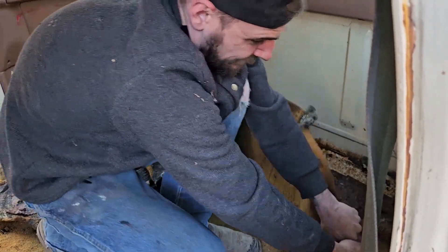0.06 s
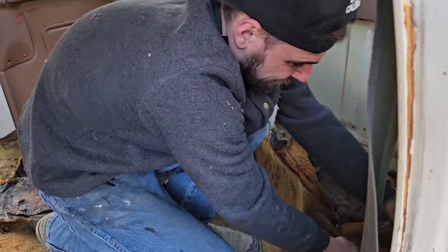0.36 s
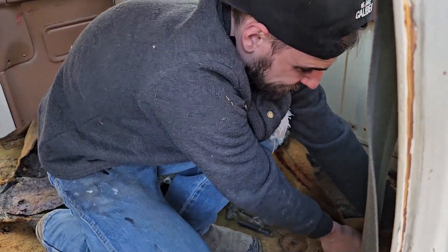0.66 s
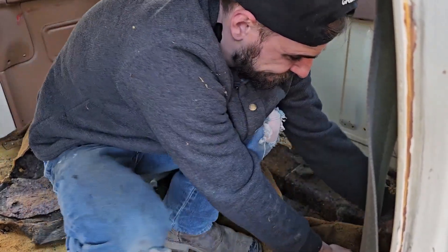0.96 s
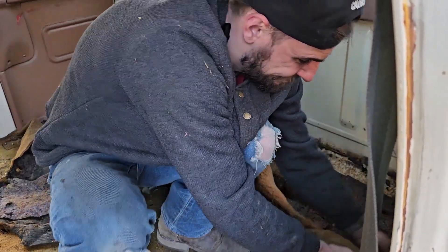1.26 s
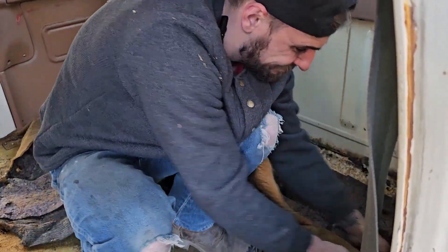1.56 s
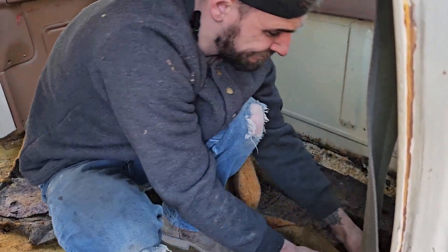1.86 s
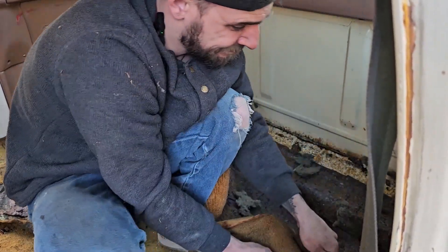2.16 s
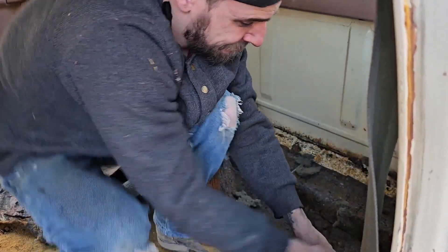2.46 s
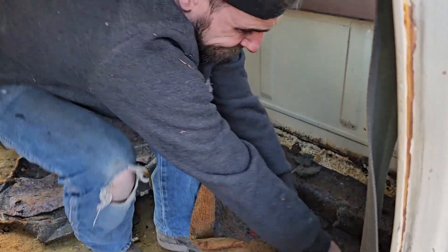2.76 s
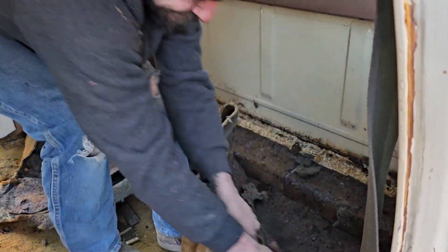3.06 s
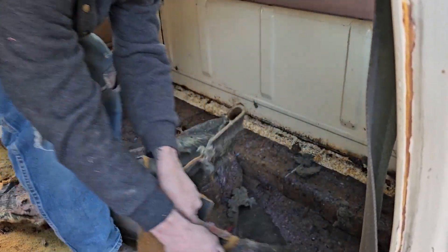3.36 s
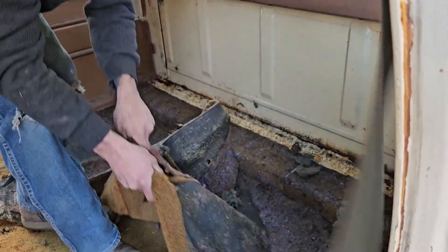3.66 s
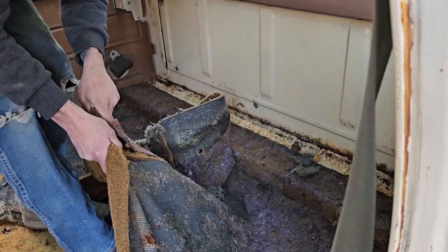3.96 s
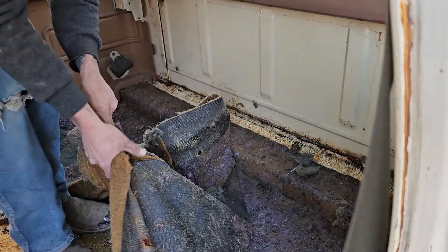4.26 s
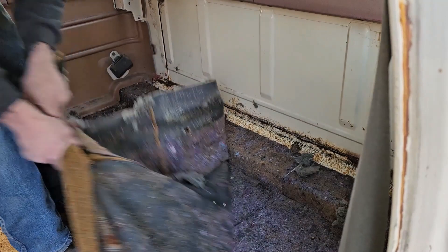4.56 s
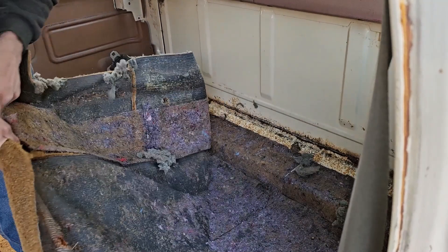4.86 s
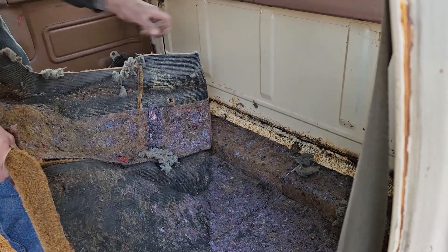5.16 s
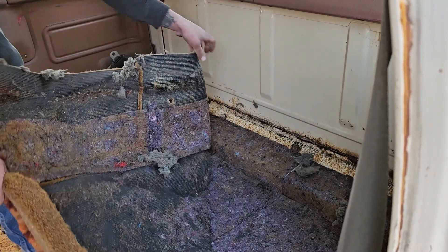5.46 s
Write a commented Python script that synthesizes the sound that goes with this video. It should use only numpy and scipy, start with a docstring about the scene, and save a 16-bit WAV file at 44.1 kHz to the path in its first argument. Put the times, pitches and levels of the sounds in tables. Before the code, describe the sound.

Old carpet is ripped off a steel truck floor in short tugs and one long haul, scraping and crackling, with snaps and boot thuds.

```python
"""Old carpet and its padding are ripped off the steel floor of a truck cab: short tugs, a long haul,
two more pulls and a last tug. Glue and fibres fracture in a dense crackle, stick-slip friction makes
the stiff backing scrape, and both are heard over the drumming of the floor pan. Stuck patches snap
free, boots thud on the pan, grit ticks and a hard fitting clacks; these impacts reverberate briefly
in the cab. Light rubs, swishes of padding and a very faint background hiss lie underneath."""
import sys
import numpy as np
from scipy import signal
from scipy.fft import rfft, irfft, next_fast_len
from scipy.io import wavfile
from scipy.ndimage import uniform_filter1d, map_coordinates

SR = 44100
rng = np.random.default_rng(int(sys.argv[2]) if len(sys.argv) > 2 else 0)


def waveform_to_disk(signal):
    """Save audio, clipped to [-1, 1], as 16-bit WAV at the path in sys.argv[1]."""
    frames = np.transpose(np.atleast_2d(signal))
    scaled = np.clip(frames, -1, 1) * 32767
    samples = np.round(scaled).astype(np.int16)
    wavfile.write(sys.argv[1], SR, samples)


N = 251120

# level of the faint background hiss: time_s, level_db
BACKGROUND_LEVEL = [(0, -66), (0.6, -63), (1.85, -71), (2.6, -69), (4.8, -73), (5.1, -81), (5.45, -80),
                    (5.69, -73)]
# short pulls: start_s, rise_s, let_go_s, scrape_db, crackle_db, drum_db, tilt_db_per_octave
TUGS = [ (0.04, 0.043, 0.18, -50.5, -83, -56.5, 6), (0.663, 0.11, 0.8, -23.5, -59, -25, -12.5),
        (0.82, 0.057, 1.01, -24, -35, -21.5, -3.5), (1.03, 0.04, 1.343, -34.5, -40.5, -36, -1),
        (1.21, 0.04, 1.294, -24.5, -33.5, -24.5, -1), (1.35, 0.047, 1.485, -47, -72, -35.5, -7.5),
        (1.54, 0.055, 1.632, -16.5, -27, -22.5, 1), (1.909, 0.027, 2.018, -18, -27, -21, 1.5),
        (2.21, 0.05, 2.34, -59, -75.5, -69, -2.5), (3.98, 0.05, 4.14, -46, -67, -39, 8.5),
        (4.22, 0.04, 4.4, -53, -70, -35, -1.5), (4.405, 0.17, 4.6866, -16.5, -23.5, -19.5, 5),
        (4.721, 0.03, 4.785, -38.5, -69, -37.5, -14), (5.58, 0.06, 5.65, -44.5, -55, -52, 7), ]
# grit striking steel: start_s, level_db
TICKS = [(0.091, -40.5), (2.675, -25.5), (2.7003, -25), (2.7224, -29), (4.4273, -38), (4.912, -38.5),
         (5.233, -25), (5.6334, -19.5)]
# light rubs: centre_s, half_length_s, pitch_hz, level_db
RUBS = [(0.119, 0.11, 129, -40.5), (2.288, 0.057, 752, -49.5), (2.47, 0.029, 753, -56.5),
        (4.316, 0.057, 720, -40), (4.807, 0.073, 189, -32.5), (5.619, 0.02, 221, -44),
        (5.633, 0.039, 644, -42.5)]
# strokes of padding: centre_s, half_length_s, level_db
SWISHES = [(0.137, 0.088, -50), (0.693, 0.042, -48)]
# stuck patches letting go: start_s, level_db, relative_crack_db
SNAPS = [(0.772, -23.5, -30), (0.873, -17.5, -2), (0.9361, -3.5, 0.5), (0.944, -4, -21),
         (0.963, -11, -30.5), (1.011, -6.5, -0.5), (1.237, -1, -10.5), (1.572, -15, -8), (1.649, -10, 4.5),
         (2.026, -9, -19), (3.111, -9, -16.5), (4.439, -29, -5), (4.657, -7.5, -10)]
# weight landing on the pan: start_s, level_db, relative_slap_db, relative_ring_db
THUDS = [(0.785, -19, -6, 1), (1.22, -3.5, 0.5, -4.5), (1.311, -11, -19.5, -1.5), (2.887, -15, -2, -14.5),
         (2.945, -14, -5, -2), (4.225, -10, -7, -0.5), (4.678, -14.5, -15.5, -7.5)]
# course of the long haul: time_s, scrape_db, crackle_db
HAUL = [(2.62, -66, -69), (2.694, -58, -55.5), (2.802, -24, -48.5), (2.9, -13.5, -27.5),
        (2.946, -9.5, -31.5), (3.0, -16.5, -28.5), (3.126, -10.5, -27.5), (3.144, -14, -25.5),
        (3.352, -18, -30), (3.468, -12, -22), (3.582, -22, -28.5), (3.852, -19.5, -27.5),
        (3.91, -22.5, -27.5)]
# knocks of the hard fitting: start_s, level_db
CLACKS = [(4.064, -11)]

# normal modes of the floor pan and the fitting: pitch_hz, level_db, t60_s
PAN_MODES = [(122.3, -1, 0.28), (155, 7, 0.19), (253.6, -10, 0.5), (287, -6.5, 0.29), (368, -14, 0.28),
             (371, -3, 0.18), (509, -11, 0.3), (667, -18, 0.086)]
FITTING_MODES = [(835, 0, 0.064), (1109, 6.5, 0.089), (1170, -10, 0.03), (1340, -4, 0.057),
                 (1450, -22, 0.096), (1640, 0, 0.072), (1870, -6.5, 0.039), (1870, -19.5, 0.12),
                 (2650, -55, 0.091), (4760, -72, 0.28)]
# reverberation time of the cab: frequency_hz, t60_s
CAB_DECAY = [(130, 0.14), (500, 0.49), (2000, 0.58), (7000, 0.39)]

# spectra of the sources: frequency_hz, gain_db
BACKGROUND_SPECTRUM = [(50, -33.5), (110, -1), (220, -5), (750, 3), (1400, -3.5), (2200, -23), (3300, -8.5),
                       (5500, -7.5), (7400, -26.5)]  # background hiss
FIBRE_SPECTRUM = [(1120, -16), (1900, -2), (2310, -1), (5730, 4), (6000, 1), (6800, -10), (7080, -17),
                  (7410, -42), (9630, -66.5), (16300, -120)]  # breaking glue and fibres
BACKING_SPECTRUM = [(140, -46.5), (230, -14.5), (313, 1.5), (387, -4), (430, -0.5), (492, -4), (580, -0.5),
                    (645, -4), (760, -3), (828, -3.5), (886, -5.5), (1340, -11), (2300, -32.5), (2990, -52),
                    (5060, -120)]  # stiff carpet backing
DRUM_SPECTRUM = [(24, -71.5), (40, -37), (75, -33), (109, -10), (129, 4), (145, 0), (190, -0.5),
                 (219, -11.5), (250, -3), (320, -21.5), (550, -120)]  # dull drumming of the pan
GRIT_SPECTRUM = [(900, -41.5), (1500, -14), (2100, 3), (3500, 6.5), (5500, -2), (7400, -29)]  # small hard contacts
SWISH_SPECTRUM = [(2000, -39), (3200, -14), (4100, -6), (4500, -4), (5050, 4.5), (5800, -12), (7400, -36)]  # padding on steel
SLAP_SPECTRUM = [(53, -47), (90, -22), (442, 4), (651, -3.5), (755, -14), (886, -1), (1400, -28.5),
                 (1680, -18.5), (2200, -42), (2860, -70), (4840, -120)]  # cushioned impact
RATTLE_SPECTRUM = [(450, -34.5), (800, 0), (1400, 1.5), (1800, -6.5), (2200, -18), (3000, -24), (6000, -40)]  # dull rattle of the fitting

SWELL_POWER = 1.72  # a pull builds up as this power of time
PAN_LAG_S, PAN_RING_DB = 0.006, -8.5  # the pan's delay behind the sheet; its ringing re its drumming
SCRAPE_FALL_DB_PER_S, CRACKLE_FALL_DB_PER_S, DRUM_FALL_DB_PER_S = 252.5, 342, 185
SLACKEN_DB_PER_OCTAVE_S, TIGHTEN_DB_PER_OCTAVE_S = 45.5, 6.65
HAUL_TILT_DB_PER_OCTAVE, HAUL_DRUM_DB = -2.1, -25.5  # tilt at the start; drumming at median crackle
# a hard-pulled sheet cups a hollow over the floor, which resonates above a threshold scrape level
HOLLOW_HZ, HOLLOW_OCTAVES, HOLLOW_FROM_DB, HOLLOW_DB_PER_DB = 550, 0.17, -16, 2
TOP_HZ = 7450


def amp(db):
    """Decibels to amplitude ratio."""
    return 10 ** (np.asarray(db) / 20)


def unit(x):
    """Normalisation to rms 1."""
    return x / np.sqrt(np.mean(x ** 2) + 1e-20)


def along(points, hz):
    """Interpolation of (frequency_hz, value) points on a logarithmic frequency axis."""
    f, v = np.transpose(points)
    return np.interp(np.log(hz + 1), np.log(f + 1), v)


def curves(rows):
    """Linear interpolation of each column after the time, one value per sample."""
    s, *cols = np.transpose(rows)
    order = np.argsort(s, kind="stable")
    return [np.interp(np.arange(N) / SR, s[order], c[order]) for c in cols]


def wobble(rate):
    """Smooth random modulation: a spline through rate knots a second."""
    return map_coordinates(rng.standard_normal(N // 20), [np.arange(N) * rate / SR], mode="wrap")


def colour(x, spectrum):
    """Minimum-phase filtering: folding the cepstrum makes the response causal."""
    size = 2 * next_fast_len(len(x) // 2 + 4096)
    gain = np.maximum(amp(along(spectrum, np.fft.rfftfreq(size, 1 / SR))), 1e-6)
    cepstrum = irfft(np.log(gain), size)
    cepstrum[1:size // 2] *= 2
    cepstrum[size // 2 + 1:] = 0
    return irfft(rfft(x, size) * np.exp(rfft(cepstrum)), size)[:len(x)]


def grains(rate, spread_db):
    """Shot noise: random impulses of uneven size, rate a second."""
    size = amp(spread_db * np.minimum(rng.exponential(size=N), 4))
    return unit((rng.random(N) < rate / SR) * size * rng.choice([-1, 1], N))


def fade(t60):
    """Half a second of exponential damping, 60 dB in t60 seconds."""
    return amp(-60 * np.arange(SR // 2) / SR / max(t60, 1e-3))


def click(spectrum):
    """The impulse response of a spectrum, with peak 1."""
    x = colour(signal.unit_impulse(SR // 2), spectrum)
    return x / np.abs(x).max()


def burst(spectrum, t60):
    """Exponentially damped coloured noise, with peak 1."""
    x = colour(rng.standard_normal(SR // 2) * fade(t60), spectrum)
    return x / np.abs(x).max()


def ring(modes, attack_s, scatter_db):
    """Free vibration: a sum of damped modes of scattered strength and phase, with peak 1."""
    t = np.arange(SR // 2) / SR
    x = np.zeros(len(t))
    for hz, db, t60 in modes:
        strength = amp(db + scatter_db * rng.normal())
        x += strength * fade(t60) * np.sin(2 * np.pi * (hz * t + rng.random()))
    x *= 1 - np.exp(-t / attack_s)
    return x / np.abs(x).max()


def add(track, s, sound):
    """Superposition of a sound on a track at time s."""
    start = max(round(s * SR), 0)
    track[start:start + len(sound)] += sound[:N - start]


def background_hiss():
    """The faint background hiss is broadband noise under slow amplitude modulation."""
    strength = amp(curves(BACKGROUND_LEVEL)[0] + wobble(4.0))
    return strength * unit(colour(rng.standard_normal(N), BACKGROUND_SPECTRUM))


def swell(start, rise):
    """Power-law growth of a pull from silence to full strength, in decibels."""
    progress = np.clip((np.arange(N) / SR - start) / max(rise, 1e-3), 1e-5, 1)
    return 20 * SWELL_POWER * np.log10(progress)


def release(let_go):
    """Exponential decay once the hands let go: the slack sheet turns dull and the pan rings longest."""
    after = np.maximum(np.arange(N) / SR - let_go, 0)
    pan_after = np.maximum(after - PAN_LAG_S, 0)
    return np.array([-SCRAPE_FALL_DB_PER_S * after, -CRACKLE_FALL_DB_PER_S * after,
                     -DRUM_FALL_DB_PER_S * pan_after, -SLACKEN_DB_PER_OCTAVE_S * after])


def tug(start, rise, let_go, scrape_db, crackle_db, drum_db, tilt):
    """Attack, sustain and decay of a short pull: three levels and a spectral tilt."""
    sheet_db, pan_db = swell(start, rise), swell(start + PAN_LAG_S, rise)
    held = [scrape_db + sheet_db, crackle_db + sheet_db, drum_db + pan_db, np.full(N, tilt)]
    return release(let_go) + held


def pulling():
    """Incoherent pulls add in power; their spectral tilts are averaged by scraping power."""
    power, weighted_tilt = np.full((3, N), 1e-14), np.zeros(N)
    for pull in [haul()] + [tug(*row) for row in TUGS]:
        share = amp(np.maximum(pull[:3], -200)) ** 2
        power += share
        weighted_tilt += share[0] * pull[3]
    scrape_db, crackle_db, drum_db = 10 * np.log10(power)
    return scrape_db, crackle_db, drum_db, np.clip(weighted_tilt / power[0], -15, 15)


def tearing():
    """Stick-slip peeling: the glue holds and yields, so crackle, drumming and scrape jerk together."""
    scrape_db, crackle_db, drum_db, tilt = pulling()
    jerks = np.tanh(wobble(70))
    slips = grains(rate=3600, spread_db=2.5)
    crackle = fibres(slips, crackle_db + 0.86 * jerks)
    drum = drumming(drum_db + 0.9 * jerks)
    scrape = backing(slips, scrape_db, tilt) * amp(scrape_db + 1.7 * jerks)
    return crackle + drum + scrape


def fibres(slips, crackle_db):
    """Fracture: each parting fibre or thread of glue emits an impulse, some in step with the slips."""
    breaks = unit(0.15 * slips + grains(rate=7000, spread_db=1.0))
    return unit(colour(breaks, FIBRE_SPECTRUM)) * amp(crackle_db + 1.7 * wobble(220))


def backing(slips, scrape_db, tilt):
    """Source and filter: slips excite the stiff sheet, whose resonances shift as it folds and tightens."""
    hz, t, spectra = signal.stft(colour(slips, BACKING_SPECTRUM), SR, nperseg=1024)
    now = np.minimum(np.round(t * SR).astype(int), N - 1)
    folds = uniform_filter1d(rng.standard_normal(spectra.shape), size=3, axis=0)
    folds = unit(uniform_filter1d(folds, size=8, axis=1))
    octaves = np.log2(np.clip(hz, 250, 2000) / 700)[:, None]
    detune = np.log2((hz[:, None] + 1) / HOLLOW_HZ)
    hollow_peak_db = HOLLOW_DB_PER_DB * np.maximum(scrape_db[now] - HOLLOW_FROM_DB, 0)
    hollow_db = hollow_peak_db / (1 + (detune / HOLLOW_OCTAVES) ** 2)
    gain = amp(octaves * tilt[now] + hollow_db + 2.76 * folds)
    power = amp(along(BACKING_SPECTRUM, hz))[:, None] ** 2
    gain /= np.sqrt((power * gain ** 2).sum(0) / power.sum())  # the colour changes, the power does not
    return unit(signal.istft(spectra * gain, SR, nperseg=1024)[1][:N])


def drumming(drum_db):
    """Forced vibration: parting glue patters on the floor pan, whose modes ring on afterwards."""
    patter, strength = grains(rate=1100, spread_db=2.0), amp(drum_db)
    modes = ring(PAN_MODES, attack_s=0.0037, scatter_db=1.5)
    ringing = signal.fftconvolve(patter * strength, modes / np.linalg.norm(modes))[:N]
    return unit(colour(patter, DRUM_SPECTRUM)) * strength + amp(PAN_RING_DB) * ringing


def grit():
    """Brief contact gives a bright spectrum: hard grains tick on the steel."""
    out = np.zeros(N)
    for s, db in TICKS:
        add(out, s, amp(db) * (0.76 * click(GRIT_SPECTRUM) + 0.27 * burst(GRIT_SPECTRUM, t60=0.0095)))
    return out


def cab(x):
    """Reverberation: the cab's reflections form a short noise tail, longest in the midrange."""
    hz, t, spectra = signal.stft(rng.standard_normal(SR // 2), SR, nperseg=256)
    decay = amp(-60 * t / along(CAB_DECAY, hz)[:, None])
    tail = signal.istft(spectra * decay, SR, nperseg=256)[1]
    return signal.fftconvolve(x, tail / np.linalg.norm(tail))[:N]


def rubs():
    """Friction excites single resonances: boots and carpet slide on the steel in wavering tones."""
    t, out = np.arange(N) / SR, np.zeros(N)
    wavering_time = np.cumsum(1 + .035 * wobble(70)) / SR
    flutter = amp(3.7 * wobble(76))
    for s, half, hz, db in RUBS:
        out += amp(db) * np.exp(-((t - s) / half) ** 2) * np.sin(2 * np.pi * hz * wavering_time)
    return flutter * out


def crumbs(relative_db=-35, delay_s=0.045, spread_s=0.025):
    """Sparse shot noise: crumbs trickle after each tick of grit."""
    t = np.arange(N) / SR
    trickle = sum(amp(db + relative_db) * np.exp(-((t - s - delay_s) / spread_s) ** 2) for s, db in TICKS)
    return trickle * unit(colour(grains(rate=500, spread_db=3.5), GRIT_SPECTRUM))


def swishes():
    """Friction noise: the many tiny contacts of padding brushing over steel merge into a soft hiss."""
    t = np.arange(N) / SR
    stroke = sum(amp(db) * np.exp(-((t - s) / half) ** 2) for s, half, db in SWISHES)
    return stroke * unit(colour(grains(rate=4300, spread_db=3.5), SWISH_SPECTRUM))


def snaps():
    """Sudden release of strain: a stuck patch gives way with a crack and a flap of the backing."""
    out, flap, crack = np.zeros(N), click(BACKING_SPECTRUM), click(FIBRE_SPECTRUM)
    for s, db, crack_db in SNAPS:
        add(out, s, amp(db) * (.7 * flap + 1.01 * burst(BACKING_SPECTRUM, t60=0.055)))
        add(out, s, amp(db + crack_db) * (.5 * crack + .5 * burst(FIBRE_SPECTRUM, t60=0.03)))
    return out


def thuds():
    """Cushioned impact on a plate: a boot lands with a dull slap and the pan's low modes boom."""
    out = np.zeros(N)
    for s, db, slap_db, ring_db in THUDS:
        slap = 0.74 * click(SLAP_SPECTRUM) + 1.6 * burst(SLAP_SPECTRUM, t60=0.11)
        add(out, s, amp(db + slap_db) * slap)
        add(out, s, amp(db + ring_db + 0.5) * ring(PAN_MODES, attack_s=0.01, scatter_db=2.0))
    return out


def haul():
    """Rising tension brightens the scrape of the long pull; the pan drums in step with the crackle."""
    start, let_go = HAUL[0][0], HAUL[-1][0]
    scrape_db, crackle_db = curves(HAUL) + swell(start, rise=0.018)
    drum_db = HAUL_DRUM_DB + crackle_db - np.median(np.array(HAUL)[:, 2])
    tilt = HAUL_TILT_DB_PER_OCTAVE + TIGHTEN_DB_PER_OCTAVE_S * (np.arange(N) / SR - start)
    return release(let_go) + [scrape_db + 0.5, crackle_db + 0.25, drum_db, tilt]


def fitting():
    """Hard impact excites quickly damped modes: the fitting clacks, with a dull rattle and a tick."""
    out = np.zeros(N)
    for s, db in CLACKS:
        add(out, s, amp(db - 1.5) * ring(FITTING_MODES, attack_s=0.001, scatter_db=3.5))
        add(out, s, amp(db + 1.5) * burst(RATTLE_SPECTRUM, t60=0.06))
        add(out, s, amp(db - 15.0) * burst(GRIT_SPECTRUM, t60=0.031))
    return out


def scene():
    """Superposition of all sources in one channel; only the impacts reverberate."""
    impacts = snaps() + thuds() + grit() + fitting() + crumbs()
    hiss = background_hiss()
    return (tearing() + impacts + amp(-16.5) * cab(impacts) + rubs() + swishes() + hiss)[None]


def record(dry):
    """Soft saturation rounds the highest peaks; band limiting removes deep bass and top treble."""
    rounded = dry / (1 + np.abs(dry / 0.88) ** 6) ** (1 / 6)
    highpassed = signal.sosfilt(signal.butter(2, 45, "highpass", fs=SR, output="sos"), rounded)
    size = next_fast_len(N + SR // 2)
    hz = np.fft.rfftfreq(size, 1 / SR)
    return irfft(rfft(highpassed, size) / np.sqrt(1 + (hz / TOP_HZ) ** 120), size)[..., :N]


dry = scene()
out = record(dry)
waveform_to_disk(out)
```